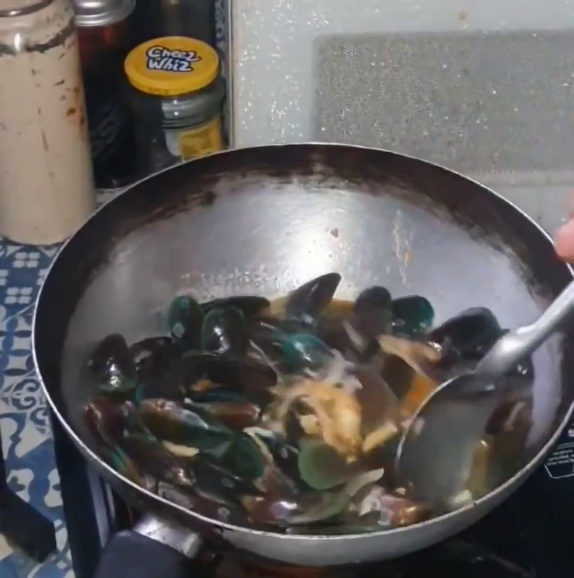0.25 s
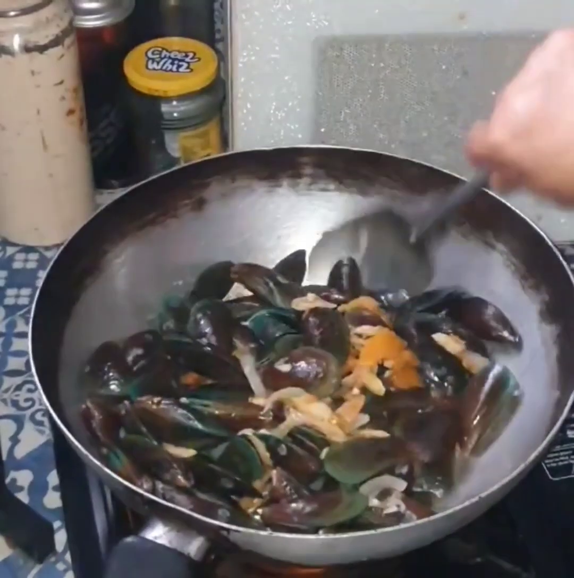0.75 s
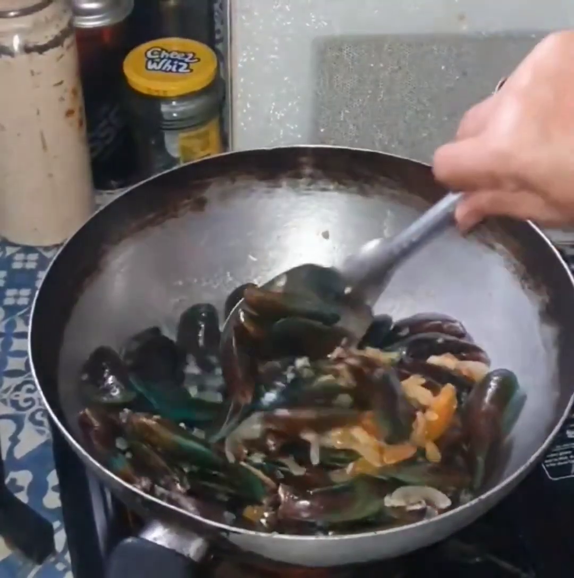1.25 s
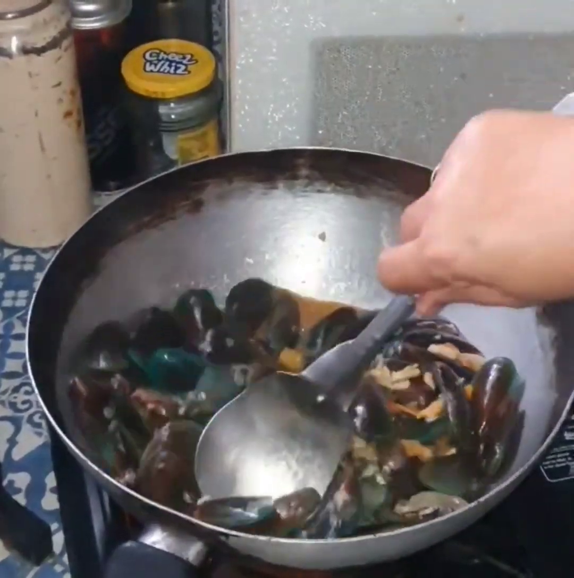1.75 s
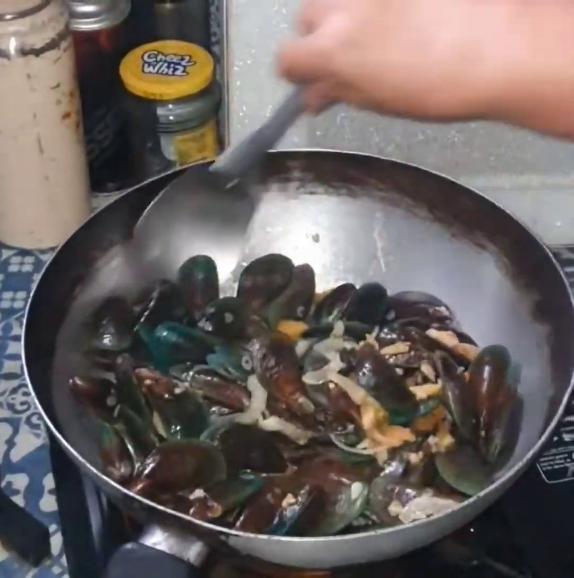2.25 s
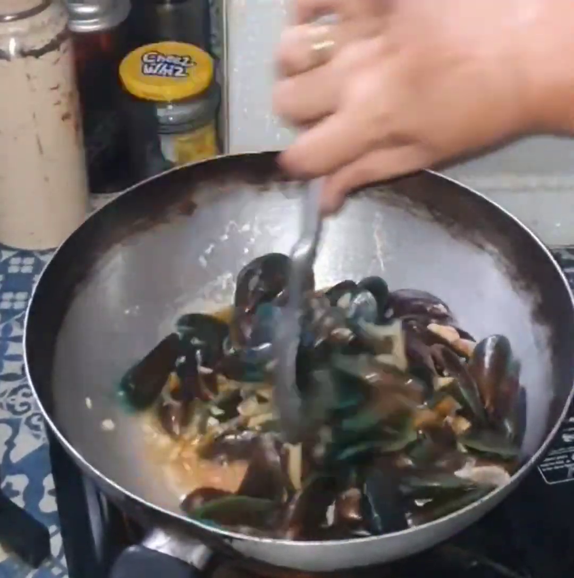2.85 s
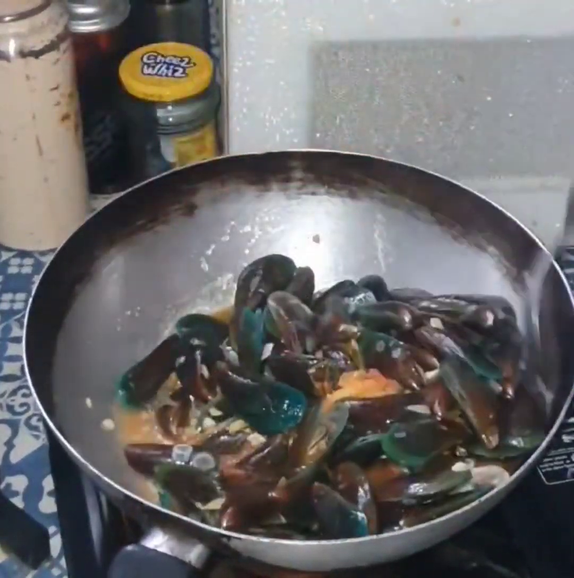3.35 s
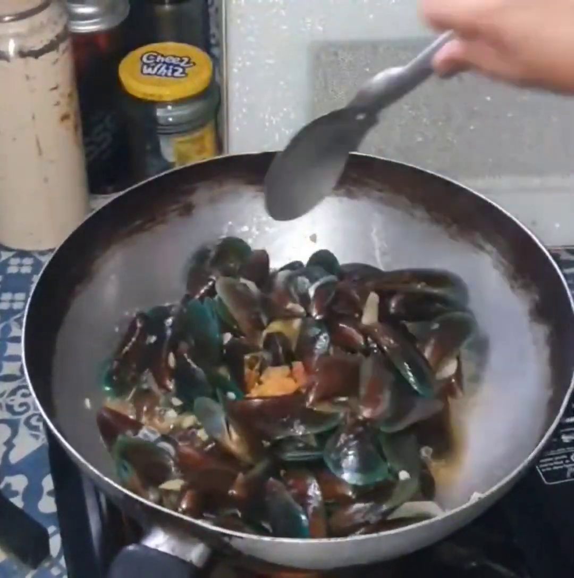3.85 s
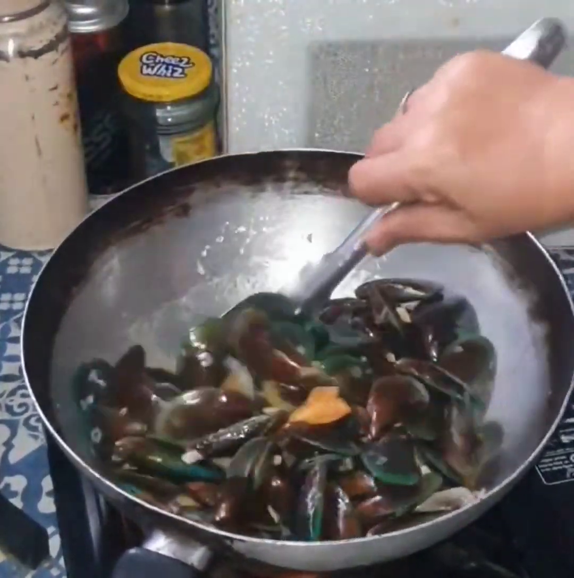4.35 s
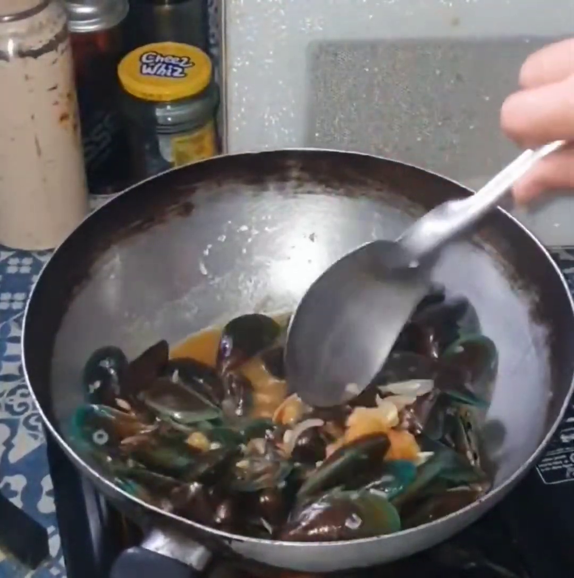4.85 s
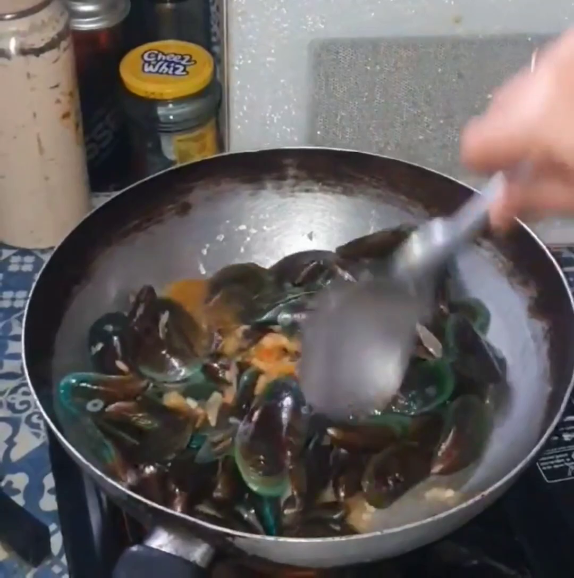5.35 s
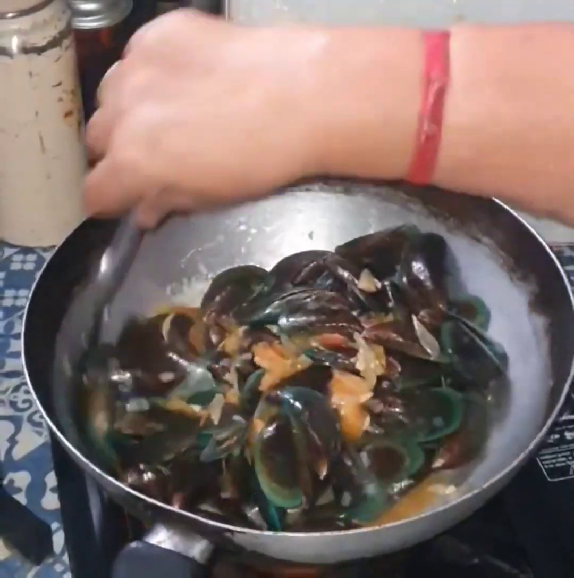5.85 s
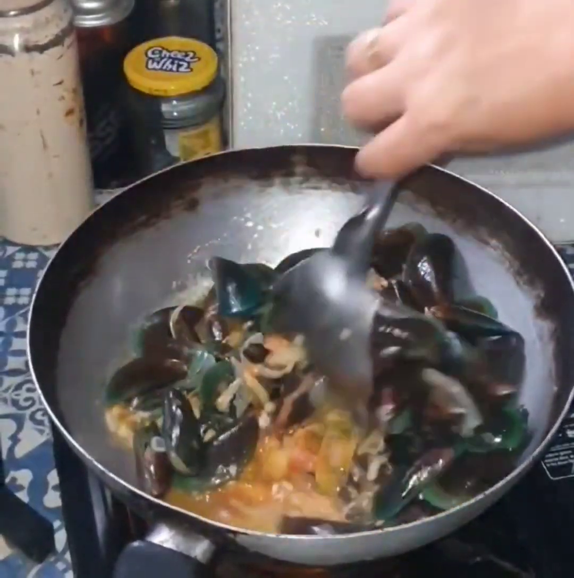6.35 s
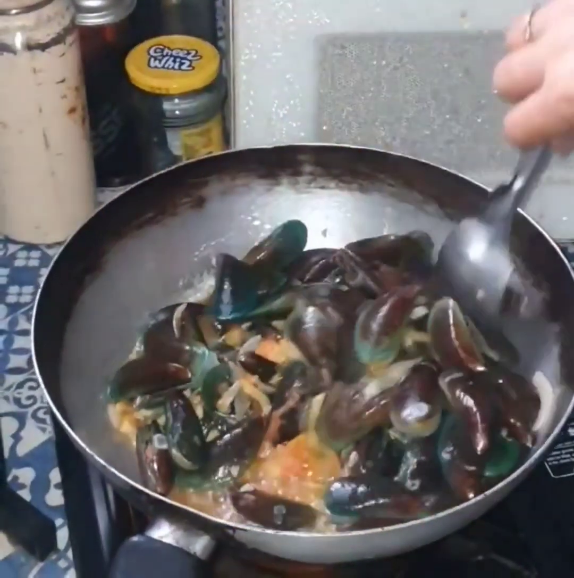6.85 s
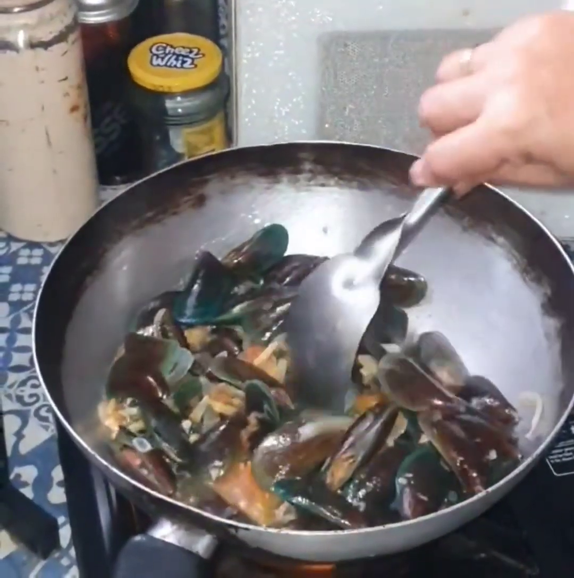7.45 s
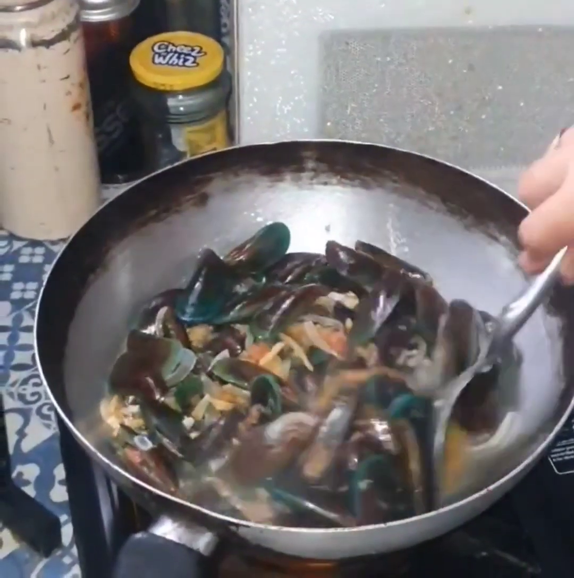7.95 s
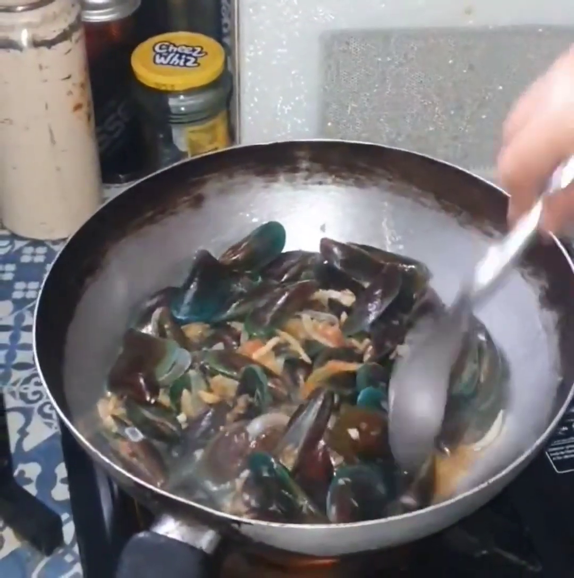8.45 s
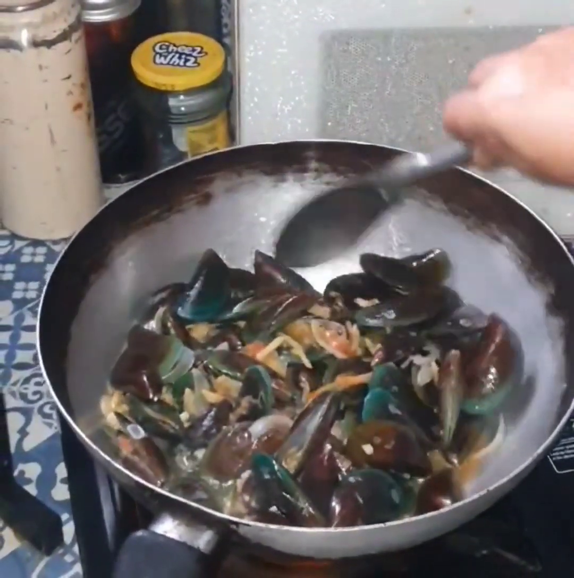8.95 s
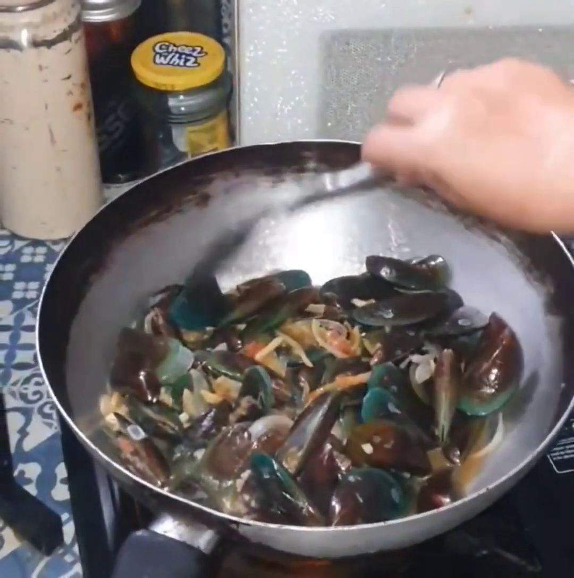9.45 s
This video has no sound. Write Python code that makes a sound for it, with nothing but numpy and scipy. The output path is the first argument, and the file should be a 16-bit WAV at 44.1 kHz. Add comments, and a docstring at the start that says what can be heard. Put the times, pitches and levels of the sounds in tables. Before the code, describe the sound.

A metal spoon clanks and scrapes around a steel wok, tumbling a heap of clacking mussel shells over a faint gas-flame hiss.

```python
"""Stirring mussels in a wok

A steel spoon stirs mussels in sauce, close by in a small kitchen: noise bursts and fading tones make its
strikes and the clacking shells. Tiny random clicks make the scraping, gliding tones the judder.
Under it are a gas flame and simmering sauce of shaped noise, an appliance hum of sine tones,
and a low rumble of deep noise that swells at the end."""
import sys
import numpy as np
from scipy import signal
from scipy.fft import rfft, irfft, next_fast_len
from scipy.io import wavfile
from scipy.ndimage import uniform_filter1d, map_coordinates

SR = 44100
rng = np.random.default_rng(int(sys.argv[2]) if len(sys.argv) > 2 else 0)


def output_pcm(signal):
    """Save a mono or channel-first signal as 16-bit PCM at the path in sys.argv[1].

    Samples are clipped to [-1, 1] before scaling.
    """
    pcm = np.clip(np.atleast_2d(signal).T, -1, 1) * 32767
    wavfile.write(sys.argv[1], SR, np.round(pcm).astype(np.int16))


N = 428211  # length in samples

# All levels in the tables are relative: the mix scales each layer again.
# Spoon on the wok: [t/s, level/dB, clang f/Hz, low knock re level/dB,
# brightness (spoon's edge over the pan's clank)/dB, sparkle re level/dB]
SPOON_STRIKES = [(0.122, -9.5, 6540, -23, 6.5, -13), (0.156, -12, 1860, -11.5, 4, -13),
                 (0.276, -13.5, 5540, -13, 22, -9), (0.643, -12.5, 6360, -7.5, 5, -8),
                 (1.621, -9.5, 4970, -23, 20, -6), (1.659, -15.5, 2120, -26, -10, -22),
                 (2.151, -13, 5800, -25, 4, -4.5), (2.304, -16.5, 3120, -12.5, -3, -6),
                 (2.319, -18.5, 3140, -13, 1, -2), (3.12, -9.5, 5600, -24, 12.5, -7),
                 (3.372, -7, 2550, -19, -0.5, -3.5), (3.46, -10.5, 1420, -13, -3, -11),
                 (3.891, -14, 5600, -10.5, 4.5, -4), (3.953, -13.5, 925, -10.5, 5, -13),
                 (4.385, -14, 7300, -38, 7, -7), (4.683, -13.5, 5890, -26, 1.5, -7),
                 (4.733, -16, 960, -16, 0.5, -12), (5.02, -9, 2650, -10.5, 0, -13),
                 (5.243, -17.5, 1150, -30, 9, -29), (5.819, -13, 2570, -35, -7, -20),
                 (5.879, -13.5, 5650, -34, 5, -7.5), (6.182, -9, 5760, -39, 9.5, -17),
                 (6.32, -11.5, 6300, -26, -1, -19), (6.353, -12.5, 6000, -34, 2, -15),
                 (6.441, -15, 6260, -28, 2.5, -12), (6.741, -14, 3610, -16.5, -2, -21),
                 (6.79, -11, 6400, -14, -1, -6), (7.151, -13.5, 2560, -32, 11.5, -10),
                 (7.319, -18.5, 5660, -25, 10, -26), (7.386, -16.5, 2010, -18, -1, -1),
                 (7.423, -17, 4200, -32, 6, -4), (7.822, -8, 5950, -30, 9, -11.5),
                 (7.843, -14.5, 5700, -18, 2.5, -1), (7.874, -17, 2110, -6.5, -13, -3),
                 (8.286, -8, 5790, -15, -4, -8.5), (8.773, -16, 3100, -6.5, -6, -26),
                 (9.15, -12.5, 5650, -14, -1.5, -11), (9.462, -13, 1960, -31, -20, -32),
                 (9.503, -18, 2740, -11.5, 0, -5)]
# Shell against shell or spoon: [t/s, level/dB, shell pitch f/Hz, steel tick re level/dB]
SHELL_CLACKS = [(0.402, -26.5, 1950, 3), (0.431, -26.5, 1180, -6), (0.715, -16, 3280, 3),
                (0.765, -13.5, 2730, -17), (0.832, -21, 1310, -14), (0.871, -20, 2100, -8),
                (0.89, -19, 2820, -15), (0.993, -26.5, 3980, -10), (1.024, -17.0, 1020, -40),
                (1.231, -38, 1330, -15), (1.254, -24.5, 2390, 0.5), (1.313, -27.5, 1550, -11),
                (1.465, -23.5, 1225, -16), (1.571, -21.5, 2500, -25), (1.689, -26, 1760, 1),
                (1.833, -28.5, 2410, -16.5), (2.21, -21.5, 2940, -17), (2.261, -22, 3250, -4),
                (2.375, -21.5, 2490, -25), (2.512, -22, 1825, -20), (2.533, -30, 1180, 5.5),
                (2.764, -25.5, 2830, 1.5), (2.858, -27.5, 4030, 2), (2.916, -22, 2980, -2),
                (2.997, -21, 2850, -18), (3.035, -28, 3650, 7), (3.214, -37.5, 3490, 13.5),
                (3.253, -19.5, 4300, 5.5), (3.305, -24.5, 1980, -16.5), (3.709, -40, 3070, -2),
                (3.837, -32, 2920, -5), (3.859, -25, 1440, -17.0), (3.965, -22.5, 883, 7.5),
                (3.983, -20.5, 3060, -0.5), (4.064, -19.5, 2770, -11), (4.116, -17, 906, -6),
                (4.212, -24.5, 1180, -2.5), (4.251, -23.5, 2570, -11), (4.275, -17, 1280, -36),
                (4.401, -19.5, 1525, 3.5), (4.46, -22.5, 2980, 0), (4.508, -29.5, 2870, -8),
                (4.605, -27.5, 2760, -20), (4.91, -33.5, 1380, -1.5), (5.035, -24, 2670, 0),
                (5.168, -17.5, 2250, -1), (5.216, -25, 2300, -18.0), (5.3, -30, 3100, -26),
                (5.36, -33.5, 3120, 11), (5.486, -35.0, 3740, -11), (5.753, -26.5, 3340, -14),
                (5.954, -23.5, 3600, 3), (6.139, -27.0, 1350, -9), (6.161, -21.5, 3510, -6.5),
                (6.401, -26, 2530, 9.5), (6.558, -20.5, 3200, 0), (6.568, -25.5, 3170, -4),
                (6.655, -32.5, 3150, 13), (6.718, -23.5, 1440, -15), (6.957, -24.5, 1010, 4.5),
                (7.358, -24, 3250, -19), (7.524, -24.5, 3230, 3.5), (7.622, -24.5, 3770, -12.5),
                (8.025, -26.5, 1310, -30), (8.106, -38.5, 1170, 4), (8.319, -14.5, 2970, -6),
                (8.511, -34.5, 2680, 7.5), (8.731, -26.5, 4300, -7.5), (8.749, -28, 2050, 7.5),
                (8.821, -25.5, 1130, 4), (8.872, -30.5, 3030, -12.5), (8.972, -30.0, 1270, -3.5)]
# The spoon's edge judders on the steel: [t/s, length/s, start f/Hz, end f/Hz, level/dB]
EDGE_JUDDERS = [(0.185, 0.12, 1091, 1190, -20), (3.416, .11, 1300, 1357, -23),
                (3.942, 0.048, 927, 916, -33), (5.02, 0.09, 1154, 1145, -21.5),
                (5.235, 0.024, 1140, 1150, -33), (6.884, 0.048, 1018, 1000, -13.5),
                (7.886, 0.079, 1380, 1403, -24.5)]
# Spoon and wok ring together: [f/Hz, level/dB, time to fade by 60 dB/s]
STEEL_MODES = [(2035, -9, 0.18), (2230, -31, 0.18), (2636, -0.5, 0.21), (3024, -6, 0.28), (3380, -5, 0.15),
               (3820, -7.5, 0.18), (4160, -2, 0.14), (4920, -5, 0.11), (5400, -4, 0.061), (5400, 3, 0.056),
               (5880, 6.5, 0.07), (6220, 0, 0.066), (6600, -3.5, 0.084), (6920, -8, 0.12), (7400, 0, 0.061),
               (7700, -15.5, 0.29), (8360, -22, 0.11), (9210, -6.5, 0.12), (10930, -7, 0.14),
               (12500, -9, 0.14), (12500, -5, 0.14)]
# Tone colour of the grinding: [f/Hz, level per Hz/dB]
GRIND_COLOUR = [(120, -56), (200, -34), (237, -7.5), (419, -5), (526, -0.5), (690, -0.5), (917, -8),
                (1040, -10), (1150, 6.5), (1640, -11), (2820, 3.5), (4580, -6.5), (6000, -8.5), (7800, -28),
                (13200, -120)]
# Tone colour of the hiss on the steel: [f/Hz, level per Hz/dB]
HISS_COLOUR = [(3000, -28), (4600, -11), (5800, -3), (7200, 0), (8600, -10.5), (10000, -16.5),
               (11200, -6.5), (12700, -11.5), (14000, -42)]
# Tone colour of the gas flame: [f/Hz, level per Hz/dB]
FLAME_COLOUR = [(29, -64), (50, 2), (166, -13), (248, -6.5), (398, -18), (504, -11), (752, -18.5),
                (827, -19.5), (1050, -19), (1930, -22.5), (2070, -21.5), (3740, -27.5), (6430, -30.5),
                (12200, -46.5), (14000, -47)]
# Loudness of the deep rumble over time: [t/s, level/dB]
RUMBLE_LEVEL = [(0.0, -50), (2.67, -43), (4.27, -59), (8.4, -62.5), (8.62, -37), (8.75, -44.5), (9.7, -31)]
# Average pitches of the appliance hum: [f/Hz, level/dB]
HUM_TONES = [(60, -66), (121.5, -54), (232, -58.5)]
# How long the kitchen echoes: [f/Hz, time to fade by 60 dB/s]
KITCHEN_FADE = [(200, 0.22), (800, 0.15), (2000, 0.23), (5500, 0.23), (13000, 0.018)]
# Pushes of the spoon through shells and over steel: [t/s, length/s, grinding level/dB, hiss level/dB]
SPOON_PUSHES = [(0.135, 0.17, -27, -27.5), (0.68, .09, -29.5, -31), (0.83, 0.055, -23, -32.5),
                (0.987, 0.073, -29, -48), (1.22, 0.41, -35.5, -46), (1.56, .13, -25.5, -31.5),
                (1.74, 0.11, -32.5, -43.5), (2.198, .16, -32, -38), (2.519, 0.082, -29, -35),
                (2.762, 0.27, -32.5, -44.5), (3.04, 0.17, -32, -45), (3.382, 0.1, -25, -24.5),
                (3.623, 0.11, -41, -56), (3.965, 0.13, -23, -32), (4.19, 0.074, -28, -39),
                (4.386, 0.096, -37, -31), (4.526, 0.13, -34, -47.5), (5.017, 0.078, -25, -36),
                (5.123, 0.075, -23, -32), (5.664, 0.12, -41, -37), (5.787, 0.19, -32.5, -34.5),
                (6.198, 0.084, -30, -39), (6.345, .14, -27.5, -37), (6.516, 0.27, -35.5, -47),
                (6.757, 0.17, -23, -29.5), (7.024, 0.084, -39, -65), (7.44, .1, -32, -41),
                (7.833, 0.019, -28, -20.5), (7.9, 0.055, -31.5, -36), (8.292, 0.021, -28, -31.5),
                (8.763, .08, -35.5, -39)]
# Tone colour of the rumble: [f/Hz, level per Hz/dB]
RUMBLE_COLOUR = [(20, -36), (33, -33), (42, -7.0), (48, -12.5), (65, -28), (150, -120)]
# Left-right difference of the echo: [f/Hz, gain]
KITCHEN_WIDTH = [(150, 0.11), (600, 0.72), (2000, 1.0), (6000, 1.13)]
# Modes of a clacking shell: [f as a multiple of its pitch, level/dB, time to fade by 60 dB/s]
SHELL_MODES = [(1, 0, .027), (1.152, -7, .018), (0.906, -6, .016), (1.689, -9, .011)]
# Modes of a small tumbling shell: same columns
SMALL_SHELL_MODES = [(1, 0, .02), (1.26, -4, .014), (1.9, -5, .01), (2.6, -9, .008)]

TOP_HZ = 13100  # upper band limit
TIME = np.arange(N) / SR  # seconds
AGE = np.arange(SR // 3) / SR  # seconds since a contact
CONTACT_T60_S = 0.057  # basic chatter time of a strike, as a 60 dB fade
CLANG_DB, RING_DB = -5.5, -13  # clang and ring, relative to the strike's level
SHELL_KNOCK_DB = -18  # what the heap passes on to the pan, relative to the clack
PUSH_RISE_S = 0.026  # time for a push to rise by 20 dB
PUSH_RELEASE_DB_PER_S, HISS_RELEASE_DB_PER_S = 147, 204  # how fast the heap settles


def amp(db):
    """Turn decibels into a gain."""
    return 10 ** (np.asarray(db) / 20)


def unit(x):
    """Scale a sound to an average strength (rms) of 1."""
    return x / np.sqrt(np.mean(x ** 2) + 1e-20)


def blow(x):
    """Scale a contact to the energy of 20 ms at rms 1."""
    return x * np.sqrt(SR / 50 / np.sum(x ** 2))


def along(points, hz):
    """Read (frequency, value) points on a logarithmic frequency axis."""
    f, value = np.transpose(points)
    return np.interp(np.log(hz + 1), np.log(f), value)


def wobble(rate):
    """Draw a smooth random curve through a given number of random points a second."""
    knots = rng.standard_normal(int(N * rate / SR) + 4)
    return map_coordinates(knots, [TIME * rate])


def filtered(x, response):
    """Change the strength or timing of each frequency in a sound."""
    size = next_fast_len(N + SR // 2)
    spectrum = rfft(x, size) * response(np.fft.rfftfreq(size, 1 / SR))
    return irfft(spectrum, size)[..., :N]


def coloured(x, spectrum):
    """Give a sound a tone colour from a table, at rms 1."""
    return unit(filtered(x, lambda hz: amp(along(spectrum, hz))))


def band(x, lo_hz, hi_hz, order=2):
    """Keep mainly the frequencies between two limits."""
    edges = [lo_hz, min(hi_hz, SR / 2 - 100)]
    return signal.lfilter(*signal.butter(order, edges, 'band', fs=SR), x)


def fade(t60, size=len(AGE)):
    """Die away by 60 dB in t60 seconds."""
    return np.exp(-np.log(1000) * AGE[:size] / np.maximum(t60, 1e-3))


def burst(lo_hz, hi_hz, t60, linger_db, linger_t60, rise_s=0.00089):
    """Make a contact's noise in one band: a crack, cushioned by sauce, and the pan's short shiver."""
    decay = fade(t60) + amp(min(linger_db, 0)) * fade(linger_t60)
    shape = decay * (1 - np.exp(-AGE / rise_s))
    return blow(band(rng.standard_normal(len(AGE)) * shape, lo_hz, hi_hz))


def ring(modes, scatter_db, size=len(AGE)):
    """Sum fading tones with new random strengths at every call; a soft start keeps them from thumping."""
    t = AGE[:size]
    tones = np.zeros(size)
    for hz, db, t60 in modes:
        strength = amp(db + scatter_db * rng.normal()) * rng.choice([-1, 1])
        tones += strength * fade(t60, size) * np.sin(2 * np.pi * hz * t)
    return blow(tones * (1 - np.exp(-t / .0007)))


def tuned(modes, hz):
    """Set a shell's modes to its own pitch."""
    return [(hz * ratio, db, t60) for ratio, db, t60 in modes]


def grains(rate, spread_db):
    """Scatter tiny clicks of unequal size, on average rate a second."""
    hits = (rng.random(N) < rate / SR) * rng.choice([-1, 1], N)
    return hits * amp(spread_db * np.clip(rng.standard_normal(N), -2, 2))


def add(track, s, sound):
    """Mix in a contact, the right side 0 to 2 samples late at random to loosen the treble between the sides."""
    for side, lag in zip(track, (0, rng.integers(3))):
        part = side[max(round(s * SR), 0) + lag:][:len(sound)]
        part += sound[:len(part)]


def stove():
    """Mix flame noise, popping simmer, gently wavering hum tones and deep rumbling noise."""
    flame = amp(-45) * coloured(rng.standard_normal(N), FLAME_COLOUR)
    # separate noise on the left and right makes the flame wide
    wide_noise = band(rng.standard_normal((2, N)), 680, 16800, order=1)
    wide_flame = amp(-47.5) * coloured(wide_noise, FLAME_COLOUR)
    pops = grains(rate=200, spread_db=7)
    simmer = amp(-60.0) * unit(band(pops, 1800, 6500))
    hum = np.zeros(N)
    for hz, db in HUM_TONES:
        level = amp(db + 2.2 * wobble(4.3))
        phase = 2 * np.pi * np.cumsum(hz + 0.9 * wobble(3.5)) / SR
        hum += level * unit(np.sin(phase))
    rumble_db = np.interp(TIME, *np.transpose(RUMBLE_LEVEL))
    rumble = amp(rumble_db - .5) * coloured(rng.standard_normal(N), RUMBLE_COLOUR)
    return flame + wide_flame + simmer + hum + rumble


def spoon_strikes():
    """The spoon lands and chatters, from dull clank to bright edge; a short steel ring follows each strike."""
    out = np.zeros((2, N))
    for s, db, hz, knock_db, bright_db, sparkle_db in SPOON_STRIKES:
        # clank and edge share the energy
        dull = 1 / np.sqrt(1 + amp(bright_db) ** 2)
        bright = dull * amp(bright_db)
        knock = amp(knock_db - 0.5) * burst(347, 1120, CONTACT_T60_S, -12.5, 0.21)
        clank = dull * amp(-3.0) * burst(1230, 4040, CONTACT_T60_S * 0.86, -16.5, 0.26)
        edge = bright * amp(-4.0) * burst(5220, 7930, CONTACT_T60_S * 0.96, -14.0, 0.17)
        sparkle = amp(sparkle_db - 0.5) * burst(11060, 12670, CONTACT_T60_S, -12, 0.23)
        # a narrow band stands for a cluster of close pan modes
        clang = amp(CLANG_DB) * burst(hz * 0.944, hz * 1.077, 0.015, -16, 0.086)
        steel = amp(RING_DB) * ring(STEEL_MODES, scatter_db=4)
        snap = amp(-10) * burst(2500, 10000, .006, -40, .02)
        strike = snap + knock + clank + edge + sparkle + clang + steel
        add(out, s, amp(db) * strike)
    return out


def drag():
    """Follow the pushes: the spoon bites, holds and the heap settles; the strongest push sets each level in dB."""
    grind, hiss = np.full(N, -80.), np.full(N, -80.)
    for s, length, grind_db, hiss_db in SPOON_PUSHES:
        rise_db = 20 * np.minimum(TIME - s, 0) / PUSH_RISE_S
        after = np.maximum(TIME - s - length, 0)
        grind = np.maximum(grind, grind_db + rise_db - PUSH_RELEASE_DB_PER_S * after)
        hiss = np.maximum(hiss, hiss_db + rise_db - HISS_RELEASE_DB_PER_S * after)
    return grind, hiss


def scraping():
    """Tiny slips of shell and spoon grind through the heap and set the steel singing."""
    grind_db, hiss_db = drag()
    rough_grains = grains(rate=700, spread_db=4.5) * amp(3.2 * wobble(70))
    grind = coloured(rough_grains, GRIND_COLOUR)
    slips = grains(rate=3000, spread_db=2.5) * amp(1.5 * wobble(60))
    # every slip starts the steel's ring
    singing = unit(signal.fftconvolve(slips, ring(STEEL_MODES, scatter_db=2))[:N])
    hiss = coloured(slips, HISS_COLOUR) + amp(-0.5) * singing
    return amp(grind_db - 3.0) * grind + amp(hiss_db - 1.0) * hiss


def tumbling():
    """Many small shells jostle, louder when the spoon pushes harder; a few stand out."""
    out = np.zeros((2, N))
    push_db = drag()[0]
    for when, size, pitch in rng.random((1200, 3)):
        hz = 800 * 4.2 ** pitch
        shell = ring(tuned(SMALL_SHELL_MODES, hz), scatter_db=5.5, size=1500)
        level_db = push_db[int(when * N)] - 10 + 13 * size ** 3
        add(out, when * N / SR, amp(level_db) * shell)
    return out


def juddering():
    """The spoon's edge sticks and slips: a short, rough, gliding tone that rattles the pan."""
    out = np.zeros((2, N))
    for s, length, start_hz, end_hz, db in EDGE_JUDDERS:
        size = int(length * SR)
        uneven = 1 + .08 * wobble(600)[:size]
        glide_hz = np.linspace(start_hz, end_hz, size) * uneven
        phase = 2 * np.pi * np.cumsum(glide_hz) / SR
        rattle = amp(-8) * unit(band(rng.standard_normal(size), 1100, 2200))
        tone = (np.sin(phase) + rattle) * amp(2.2 * wobble(220)[:size])
        add(out, s, amp(db) * unit(tone * signal.windows.tukey(size, .5)))
    return out


def shell_clacks():
    """Each shell has a few quickly dying modes, and knocks on the pan through the heap."""
    out = np.zeros((2, N))
    for s, db, hz, tick_db in SHELL_CLACKS:
        shell = ring(tuned(SHELL_MODES, hz), scatter_db=4)
        crack = burst(1150, 3900, .01, -17, .06)
        knock = amp(SHELL_KNOCK_DB) * burst(502, 890, 0.015, -13, 0.072)
        low_tick = burst(4800, 8400, .009, -20, .06)
        high_tick = burst(8400, 13400, .009, -25, .04)
        tick = amp(tick_db - 4.75) * (low_tick + amp(-8) * high_tick)
        clack = amp(-1.4) * shell + amp(-5) * crack
        steel = amp(tick_db - 8) * ring(STEEL_MODES, scatter_db=11)
        add(out, s, amp(db) * (clack + knock + tick + steel))
    return out


def shifting(x, depth_db, size):
    """As the point of contact moves, different resonances stand out from moment to moment."""
    z = signal.stft(x, nperseg=256)[2]
    # a random pattern over pitch and time, smoothed along both
    field = uniform_filter1d(rng.standard_normal(z.shape[-2:]), size=3, axis=0)
    field = uniform_filter1d(field, size=size, axis=1)
    gains = unit(amp(depth_db * unit(field)))
    return signal.istft(z * gains, nperseg=256)[1][..., :N]


def kitchen(x):
    """Close hard walls answer with fading noise, nearly alike left and right in the bass, not in the treble."""
    hz, t, z = signal.stft(rng.standard_normal((2, SR // 2)), SR, nperseg=256)
    z[1] *= along(KITCHEN_WIDTH, hz)[:, None]
    decay = np.exp(-np.log(1000) * t / along(KITCHEN_FADE, hz)[:, None])
    mid, side = signal.istft(z * decay, SR, nperseg=256)[1]
    tail = np.array([mid + side, mid - side]) / np.linalg.norm(mid + side)
    late = filtered(x, lambda f: np.exp(-2j * np.pi * f * .003))  # 3 ms later
    return signal.fftconvolve(late, tail, axes=1)[:, :N]


def scene():
    """The wok stands slightly off centre, so its sound tends to reach the left microphone first."""
    scrape = scraping()
    scrape = np.array([scrape, np.roll(scrape, 1)])  # right side one sample late
    contacts = shifting(spoon_strikes() + shell_clacks(), depth_db=3, size=16)
    stirring = shifting(scrape, depth_db=4.5, size=7)
    wok = contacts + stirring + tumbling() + juddering()
    heard = wok + amp(-5.5) * kitchen(wok)
    return amp(-4.5) * heard + stove()


def record(dry):
    """Round off the loudest peaks just under full scale and cut steeply above the band limit."""
    rounded = dry / (1 + np.abs(dry / .85) ** 6) ** (1 / 6)
    return filtered(rounded, lambda hz: 1 / np.sqrt(1 + (hz / TOP_HZ) ** 100))


dry = scene()
out = record(dry)
output_pcm(out)
```